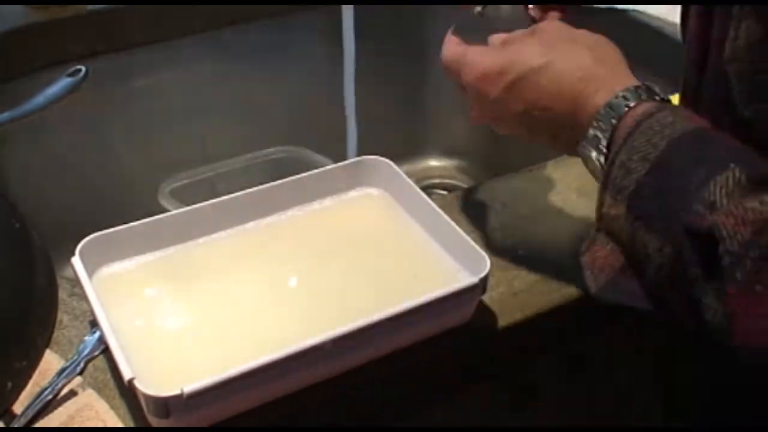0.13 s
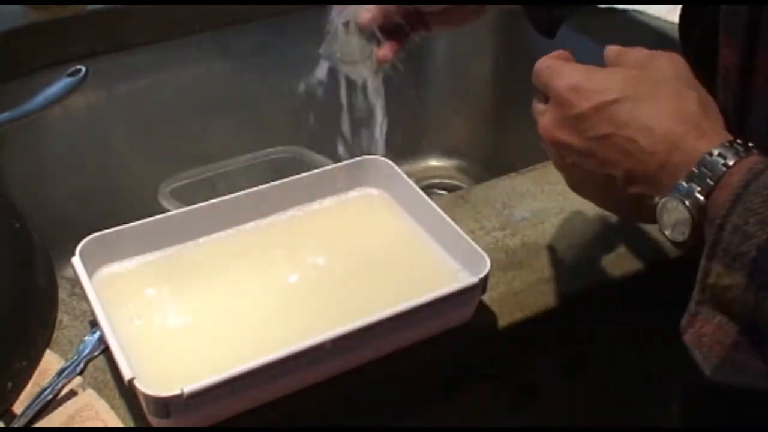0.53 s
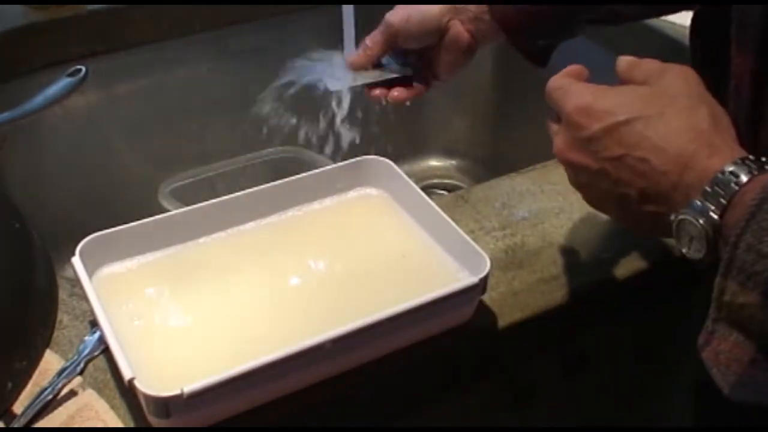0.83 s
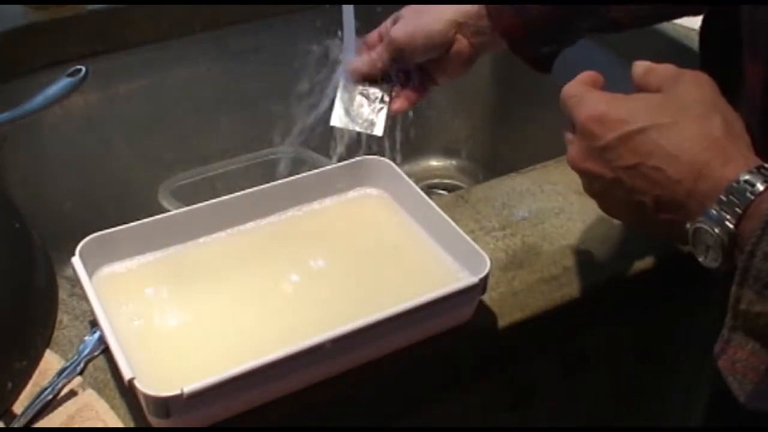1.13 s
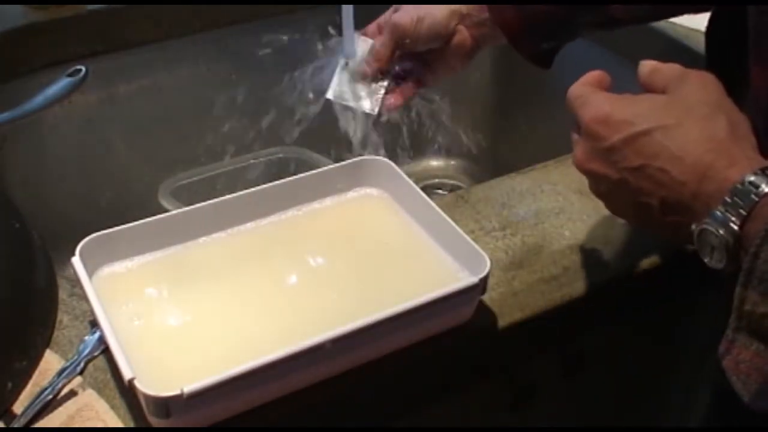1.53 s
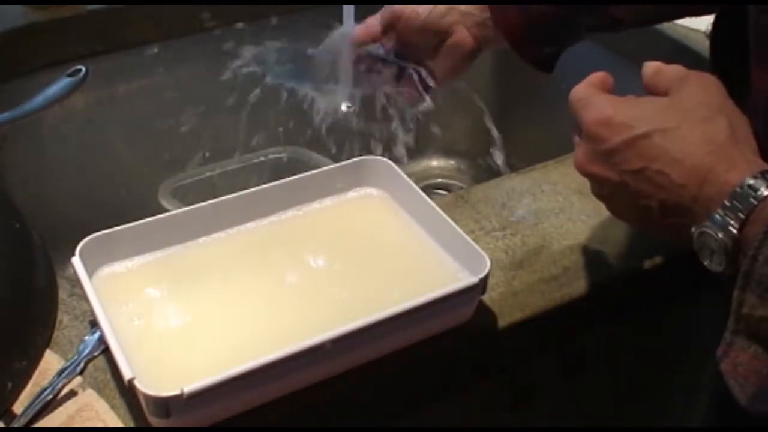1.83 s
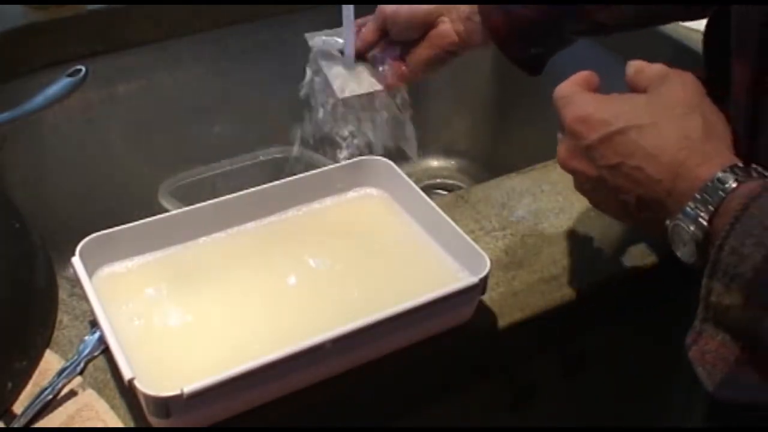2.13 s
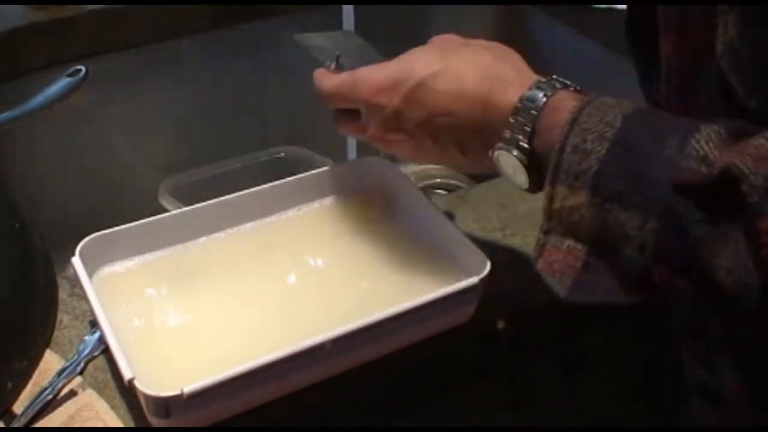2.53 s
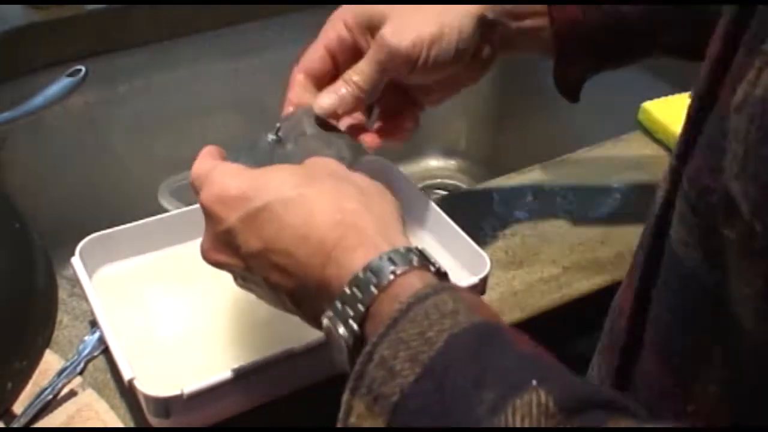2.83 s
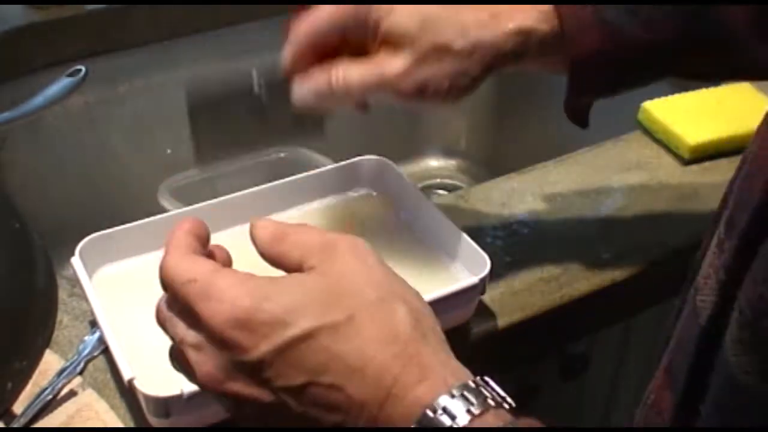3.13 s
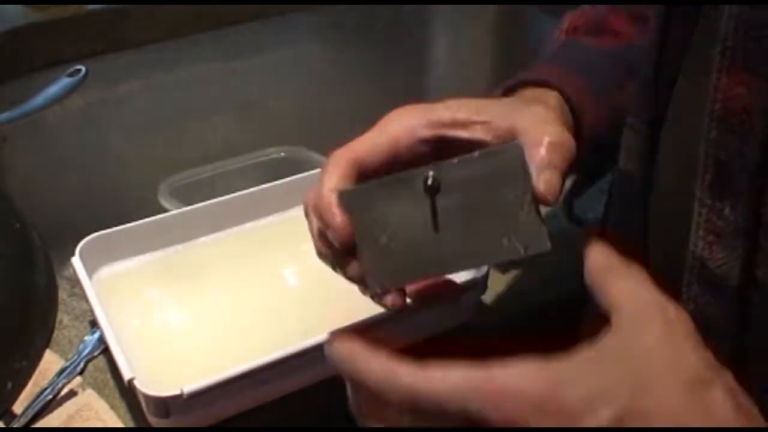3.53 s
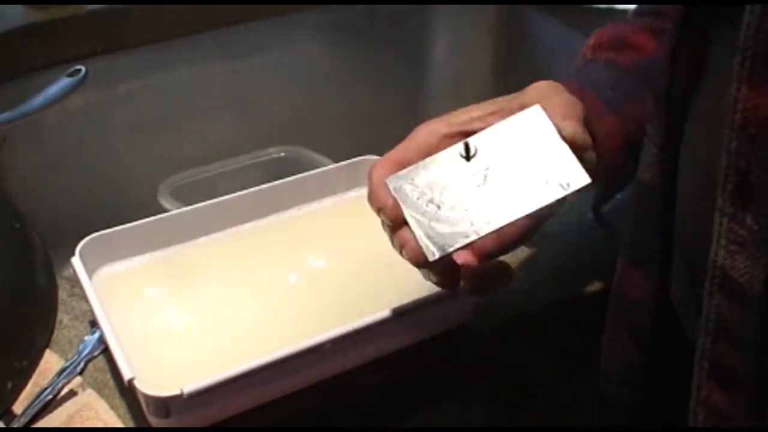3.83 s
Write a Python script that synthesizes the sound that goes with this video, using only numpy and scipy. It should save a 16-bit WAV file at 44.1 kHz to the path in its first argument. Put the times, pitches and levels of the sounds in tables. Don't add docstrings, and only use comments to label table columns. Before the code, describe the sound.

Loud kitchen faucet stream hissing on steel, splashing off a small plate, then suddenly stopped

```python
import sys
import numpy as np
from scipy import signal
from scipy.fft import rfft, irfft, next_fast_len
from scipy.io import wavfile
from scipy.ndimage import uniform_filter1d, map_coordinates

SR = 44100
rng = np.random.default_rng(int(sys.argv[2]) if len(sys.argv) > 2 else 0)


def natural_amplitude(level_db):
    exponent = np.asarray(level_db, float) / 20
    return 10 ** exponent


def transcribe(u):
    v = np.clip(np.atleast_2d(u).T, -1, 1)
    q = np.round(v * 32767).astype(np.int16)
    wavfile.write(sys.argv[1], SR, q)


N = 176400


def unit(x):
    return x / np.sqrt(np.mean(x ** 2) + 1e-20)


def along(points, hz):
    f, v = np.transpose(points)
    return np.interp(np.log(hz + 1), np.log(f + 1), v)


def wobble(rate):
    return map_coordinates(rng.standard_normal(N // 200), [np.arange(N) * rate / SR])


def coloured(x, spectrum):
    size = next_fast_len(N + 8192)
    gain = natural_amplitude(along(spectrum, np.fft.rfftfreq(size, 1 / SR)))
    return unit(irfft(rfft(x, size) * gain, size)[:N])


def patchy(depth_db, bins=8, frames=6):
    z = signal.stft(rng.standard_normal(N), nperseg=256)[2]
    field = uniform_filter1d(rng.standard_normal(z.shape), size=bins, axis=0)
    field = uniform_filter1d(field, size=frames, axis=1)
    return signal.istft(z * natural_amplitude(depth_db * unit(field)), nperseg=256)[1][:N]


def blips(s, gain, hz, life_s, rise, size):
    t = np.arange(size) / SR
    age = t / life_s[:, None]
    swell = np.e * 3 * age * np.exp(-3 * age)
    tone = np.sin(2 * np.pi * hz[:, None] * t * (1 + rise[:, None] * age / 2))
    wave = gain[:, None] * swell * tone
    at = (s * SR).astype(int)[:, None] + np.arange(size)
    return np.bincount(at.ravel(), wave.ravel(), N + SR)[:N]


def grains(per_s, hz, octaves, cycles, spread_db, size):
    count = int(per_s * N / SR)
    start, loudness, glide = rng.random((count, 3)).T
    pitch = np.clip(hz * 2 ** (octaves * rng.standard_normal(count)), 300, 15500)
    gain = natural_amplitude(-spread_db * np.log(loudness + 1 / 20))
    return unit(blips(start * N / SR, gain, pitch, cycles / pitch, 0.26 * glide, size))


# (frequency [Hz], level [dB per Hz])
ROOM_COLOUR = [(20, -29), (60, -18), (110, -12.5), (180, -3), (290, 1.5), (420, -4), (800, -8.5),
               (2500, -33)]
# (frequency [Hz], level [dB per Hz])
HISS_COLOUR = [(800, 2), (2800, -3), (9000, -1), (11700, -0.5), (12100, 1.5), (12500, -4), (13500, -3.5),
               (15600, -4)]


def room_tone():
    rumble = natural_amplitude(-47.5 + 0.94 * wobble(70)) * coloured(patchy(0.93, bins=2), ROOM_COLOUR)
    hiss_colour = [(250, -60)] + list(HISS_COLOUR)
    return rumble + natural_amplitude(-46.5) * coloured(patchy(0.93), hiss_colour)


def drain_trickle():
    shut_s, t60_s = 3.08, 2
    away = np.abs(np.arange(N) / SR - shut_s)
    bubbles = grains(200, 2850, 0.894, 6.8, 2.4, size=700)
    return natural_amplitude(-51 - 60 * away / t60_s) * bubbles


# (time [s], level [dB], centre frequency [Hz], width [octaves], decay t60 [s])
BRUSH_EVENTS = [(.056, -22.5, 1690, .5, 0.14), (.058, -10, 4000, .2, 0.066), (.811, -20, 3500, .5, 0.016),
                (3.931, -43, 8300, .5, .06), (1.195, -8, 5700, 0.098, .06),
                (2.652, -37.5, 1860, 0.09, 0.18), (2.678, -40, 1950, 0.28, 0.27),
                (2.709, -37, 1620, 0.14, 0.14), (2.664, -5.5, 10900, 0.28, 0.043),
                (2.689, -15, 13000, 0.67, 0.04), (2.775, -46.5, 13000, .4, .04),
                (2.817, -36, 10460, .3, 0.056), (2.889, -32.5, 11950, 0.48, 0.06),
                (2.885, -42.5, 930, 0.48, 0.23), (3.011, -37.5, 2470, 0.57, 0.17),
                (3.012, -37.5, 5700, .18, 0.096), (3.03, -44, 4320, 0.28, 0.12), (3.09, -54, 2180, .12, .3),
                (3.068, -36.5, 11600, .12, .06), (3.12, -35.5, 11300, .12, 0.069),
                (3.175, -43, 1800, 0.46, 0.23), (3.25, -40.5, 12000, .12, .06), (3.335, -43, 9000, .3, .1),
                (3.352, -42, 11200, .06, 0.11), (3.688, -56, 13000, .6, .04), (3.912, -49, 5700, 0.24, .3),
                (3.92, -45, 8100, .1, .15), (3.932, -42, 12800, .12, .06)]


def brushes():
    size, attack_s = 8192, 0.0039
    t, f = np.arange(size) / SR, np.fft.rfftfreq(size, 1 / SR)
    out = np.zeros(N)
    for at, level_db, centre_hz, octaves, t60 in BRUSH_EVENTS:
        band = np.exp(-(np.log2(f / centre_hz + 1e-9) / octaves) ** 2)
        puff = unit(irfft(rfft(rng.standard_normal(size)) * band))
        envelope = natural_amplitude(level_db - 60 * t / t60) * (1 - np.exp(-t / attack_s))
        piece = out[round(at * SR):][:size]
        piece += (envelope * puff)[:len(piece)]
    return out


# (time [s], peak level [dB], frequency [Hz], length [s], pitch rise [ratio])
DRIP_EVENTS = [(.691, -19.5, 2400, 0.0048, .03), (2.477, -15, 4070, 0.0065, 0.027),
               (2.55, -23, 3320, .008, 0.0055), (2.612, -8, 8120, .006, .03),
               (2.629, -16, 6950, .01, 0.014), (2.632, -4, 8880, .005, 0.034), (3.372, -43, 15000, .008, 0),
               (2.763, -51, 10800, .015, -.08), (3.014, -43, 5550, .007, 0), (3.015, -43, 2520, .012, 0),
               (3.025, -43, 2220, 0.019, -.03), (3.077, -51, 1980, .06, .12), (3.685, -46, 14800, .008, 0),
               (3.935, -39, 12700, .009, 0), (3.965, -41, 796, .012, 0), (1.776, -7, 7470, 0.012, 0.029),
               (2.736, -45, 10430, 0.03, .07), (2.737, -44, 3560, 0.011, .05),
               (2.861, -44, 2820, 0.0088, .03), (2.918, -47, 3570, 0.025, 0.022),
               (1.664, -18.5, 3166, 0.012, 0.024), (3.364, -45.5, 1630, 0.017, 0.013),
               (3.143, -45, 4450, .01, 0), (3.447, -45, 8170, .01, 0), (3.498, -45, 7480, .014, 0),
               (3.929, -29.5, 786, 0.012, 0.035), (3.948, -34.5, 405, 0.0066, -0.016)]


def drips():
    s, db, hz, life_s, rise = np.transpose(DRIP_EVENTS)
    ragged = unit(uniform_filter1d(rng.standard_normal(N), size=60))
    return blips(s, natural_amplitude(db), hz, life_s, rise, size=5000) * (1 + 0.4 * ragged)


# (time [s], peak level [dB], frequency [Hz], length [cycles])
THUMP_EVENTS = [(0.07, -22.5, 460, 6.3), (0.492, -28, 313, 3.8), (0.615, -25, 405, 5),
                (0.643, -20.5, 388, 6.6), (.747, -24.5, 541, 6), (0.789, -24, 488, 6),
                (0.804, -22, 149, 3.2), (0.811, -22.5, 1110, 9.9), (0.842, -21.5, 420, 4.9),
                (1.486, -24, 412, 5.5), (1.679, -28.5, 277, 5), (1.759, -25, 387, 5), (2.021, -24, 689, 8),
                (2.028, -22.5, 400, 4.1), (2.051, -23, 848, 6), (2.054, -26, 670, 8),
                (2.244, -21.5, 308, 3.8), (2.371, -23, 1140, 9), (2.377, -30, 700, 5.4),
                (2.474, -23, 581, 8), (2.5902, -17.5, 280, 4.7), (2.612, -31, 165, 3.5),
                (2.646, -32, 147, 3.5), (3.428, -24.5, 214, 2.5), (3.507, -26, 252, 3),
                (3.809, -27.5, 300, 3)]


def thumps():
    s, db, hz, cycles = np.transpose(THUMP_EVENTS)
    return blips(s, natural_amplitude(db - 10.5), hz, cycles / hz, 0 * hz, size=4000)


# (frequency [Hz], level [dB per Hz])
AERATOR_COLOUR = [(500, -40), (1200, -24), (2230, -15), (3590, -19.5), (11500, -1), (15600, -6)]


def aerator():
    lands_s, t60_s = 0.042, 0.138
    late = np.clip(np.arange(N) / SR - lands_s, 0, None)
    return natural_amplitude(-14.5 - 60 * late / t60_s) * coloured(patchy(2.05), AERATOR_COLOUR)


# (time [s], flow level [dB], share landing as a solid stream [0-1])
FLOW_CURVE = [(0, -21.5, 0.2), (0.045, -19, 0.48), (0.057, -3, 0.98), (.1, -6.5, 1), (.41, -7.5, 0.86),
              (.43, -12, 0), (.8, -6.5, 0), (.87, -12, 0.37), (1.3, -10, 0.05), (1.6, -10.5, 0.3),
              (1.9, -9, 0.04), (2.23, -10, 0.09), (2.246, -7, 0.95), (2.46, -7, 0.95), (2.639, -9.5, 0.96),
              (2.658, -21, 0.9), (2.71, -43.5, 0.32), (2.8, -64, 0.9)]
# (time [s], level change [dB], half length [s])
PLATE_SURGES = [(0.44, 5.5, 0.0083), (0.465, -2.5, 0.0088), (0.49, -0.5, .005), (0.506, 3, 0.012),
                (0.552, 3, 0.0097), (0.622, 2, 0.014), (0.633, 0.5, 0.0085), (0.752, 1.5, 0.007),
                (0.777, -3.5, 0.0068), (0.821, 2, 0.013), (0.832, -7, 0.0092), (0.853, 1.5, 0.0095),
                (1.292, 1, .025), (1.397, 2, 0.026), (1.457, -2, 0.019), (1.513, 2.5, 0.061),
                (1.567, -2.5, 0.0084), (1.616, 2.5, 0.039), (1.647, -3, .008), (1.665, 1.5, .008),
                (1.78, 3, 0.0079), (1.895, -5, 0.017), (1.964, 1.5, 0.044), (2.043, -4, 0.0045),
                (2.17, 2, 0.0236), (2.226, -2.5, .007), (0.726, -2, 0.0295), (2.008, -3, 0.0084),
                (0.171, 1.5, 0.01), (0.23, -2, 0.013), (0.474, 2.5, .005), (0.54, -1, 0.0145),
                (.585, -0.5, 0.0098), (0.984, 1.5, .015), (1.05, 0.5, 0.029), (1.08, -2, 0.005),
                (1.204, 1, 0.013), (1.837, -2.4, 0.016), (1.92, 1.5, .008), (2.124, 0.5, .008),
                (2.37, 0.5, 0.0098), (2.626, -0.5, .005)]


def flow():
    t = np.arange(N) / SR
    s, flow_db, solid_share = np.transpose(FLOW_CURVE)
    level_db, solid = np.interp(t, s, flow_db), np.interp(t, s, solid_share)
    for at, db, half_s in PLATE_SURGES:
        level_db += db * np.exp(-((t - at) / half_s) ** 2)
    level_db += (0.45 - 0.12 * solid) * wobble(65) + 0.22 * wobble(170)
    return level_db, solid


# (frequency [Hz], level [dB per Hz])
BASIN_COLOUR = [(25, -10), (90, -15.5), (130, 1.5), (250, -7), (410, -4), (520, -9.5), (1200, -12),
                (3000, -47)]


def basin_drum(level_db):
    push_db = 0.4 * (uniform_filter1d(level_db, size=1500) + 5.0)
    drum = coloured(patchy(1.1, bins=2), BASIN_COLOUR)
    return natural_amplitude(-40.5 + push_db + 1.04 * wobble(18)) * drum


def splashing(depth_db):
    droplets = grains(3000, 9300, 0.6, 3.1, 2.5, size=48)
    fizz = unit(np.diff(droplets, prepend=0))
    return unit(patchy(depth_db, frames=4)) + natural_amplitude(-14.5) * fizz


# (frequency [Hz], level [dB per Hz])
SOLID_COLOUR = [(600, -37.5), (1400, -27.5), (3200, -17), (5500, -6.5), (8500, -4), (9300, -0.5),
                (13200, -0.8), (15600, -8)]
# (frequency [Hz], level [dB per Hz])
WHINE_COLOUR = [(3200, -34), (3650, 1.5), (4050, 2), (4700, -38)]


def solid_stream(solid):
    whine = natural_amplitude(-22) * coloured(patchy(1.1, bins=2), WHINE_COLOUR)
    return np.sqrt(solid) * (coloured(splashing(0.97), SOLID_COLOUR) + solid * whine)


# (frequency [Hz], level [dB per Hz])
SPRAY_COLOUR = [(600, -56), (1300, -27), (2400, -19), (3300, -13.5), (5100, -8.5), (11400, -2),
                (14500, -3.5), (15600, -6)]


def spray(solid):
    return np.sqrt(1 - solid) * coloured(splashing(1.57), SPRAY_COLOUR)


def bubbles():
    pings = grains(120, 5570, 0.551, 15.8, 2.8, size=700)
    return natural_amplitude(-18.5) * coloured(pings, SPRAY_COLOUR)


def water():
    level_db, solid = flow()
    splash = solid_stream(solid) + spray(solid) + bubbles()
    return natural_amplitude(level_db + 1.0) * splash + basin_drum(level_db) + aerator()


def scene():
    background = room_tone() + drain_trickle()
    details = brushes() + drips() + thumps()
    return np.tile(background + details + water(), (2, 1))


# (time [s], low band from [Hz], low band to [Hz], high band from [Hz], high band to [Hz])
SPLIT_EVENTS = [
    (.181, 9600, 11200, 14500, 16000),
    (1.202, 7600, 9000, 9600, 11200),
    (1.853, 5700, 8300, 11600, 13200),
    (2.2, 5100, 6300, 13000, 16000),
    (2.503, 14500, 15200, 15200, 16000),
    (3.222, 5100, 8300, 11000, 15200),
    (3.595, 7500, 9000, 13000, 14500),
    (3.803, 8200, 9600, 11700, 13800),
    (3.849, 6200, 9000, 14500, 16000),
]


def split(x):
    out, size = x.copy(), 1500
    f = np.fft.rfftfreq(size, 1 / SR)
    fade = np.clip(3 * np.sin(np.pi * np.arange(size) / size), 0, 1) ** 2
    for s, low_from, low_to, high_from, high_to in SPLIT_EVENTS:
        at = round(s * SR) - size // 2
        chosen = (f > low_from) & (f < low_to) | (f > high_from) & (f < high_to)
        band = irfft(rfft(x[0, at:at + size]) * chosen)
        pair = (band + np.outer([1, -1], band[::-1])) / np.sqrt(2)
        out[:, at:at + size] += fade * (pair - band)
    return out


def band_limit(x):
    return signal.sosfilt(signal.butter(12, 15710, fs=SR, output="sos"), x)


def record(dry):
    ceiling, hardness = 1.15, 4.8
    squeezed = dry / (1 + np.abs(dry / ceiling) ** hardness) ** (1 / hardness)
    b, a = signal.butter(1, 20, "high", fs=SR)
    mix = split(signal.lfilter(b, a, squeezed))
    return band_limit(mix)


dry = scene()
out = record(dry)
transcribe(out)
```